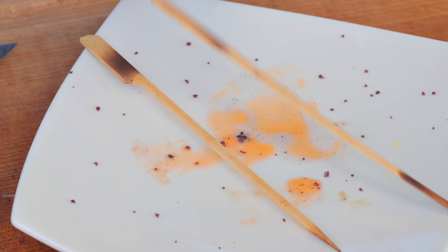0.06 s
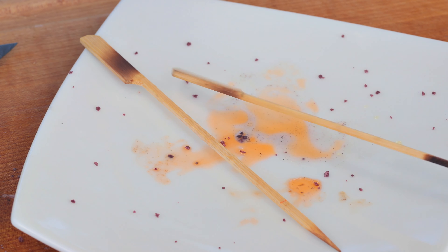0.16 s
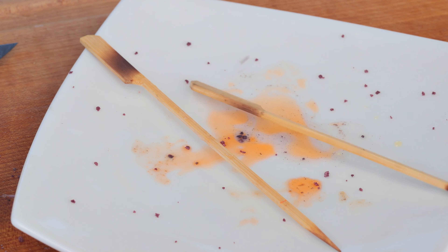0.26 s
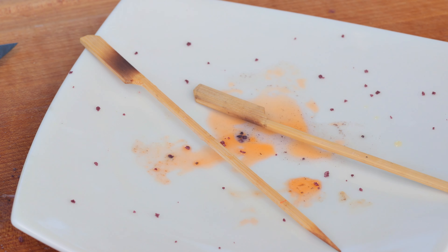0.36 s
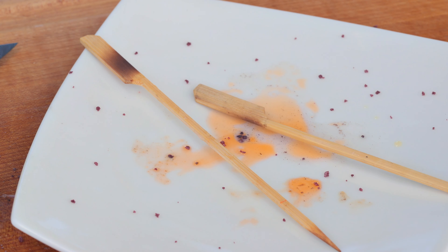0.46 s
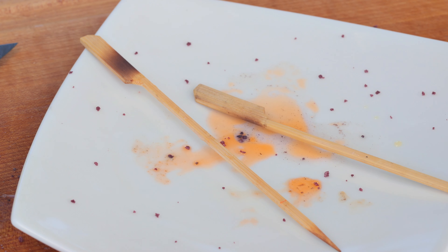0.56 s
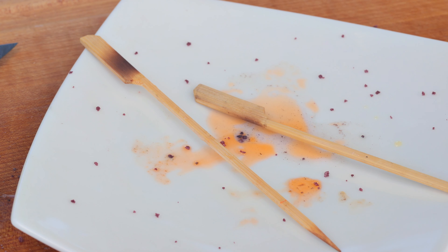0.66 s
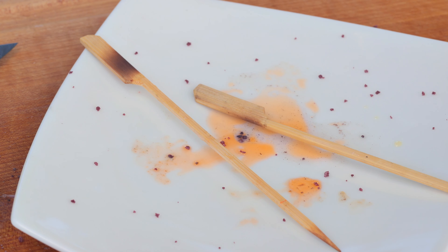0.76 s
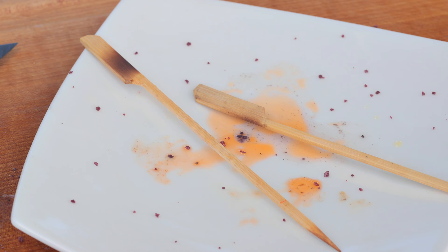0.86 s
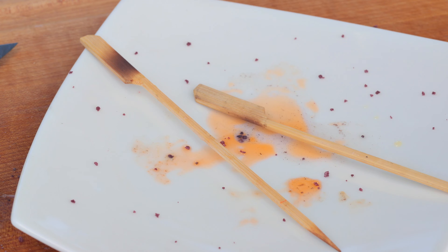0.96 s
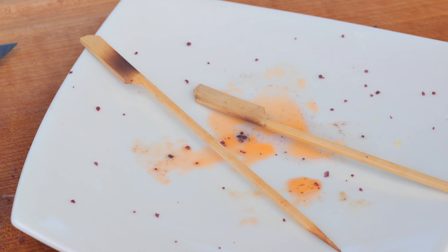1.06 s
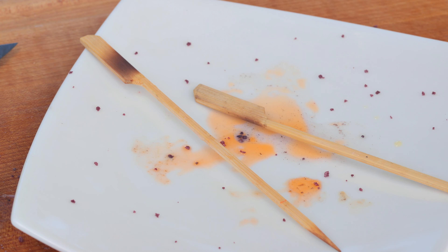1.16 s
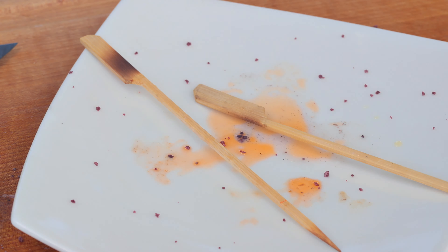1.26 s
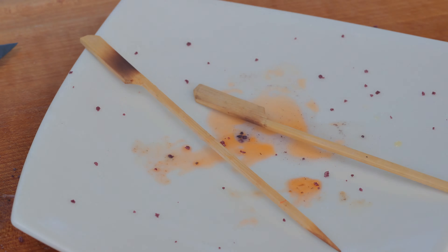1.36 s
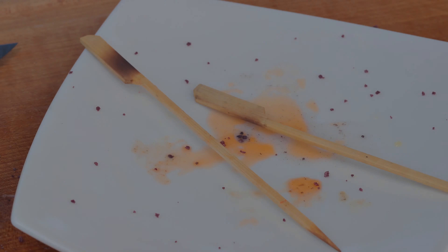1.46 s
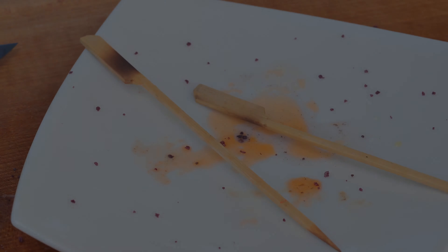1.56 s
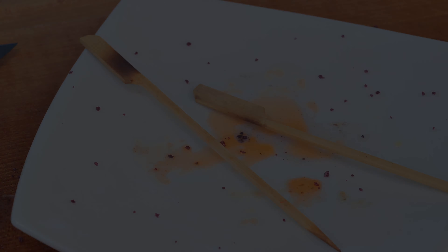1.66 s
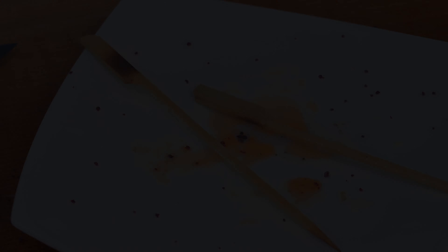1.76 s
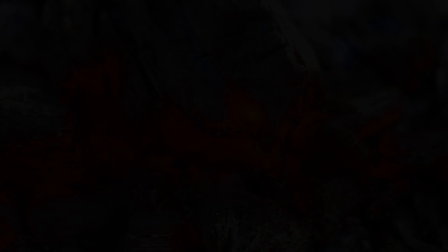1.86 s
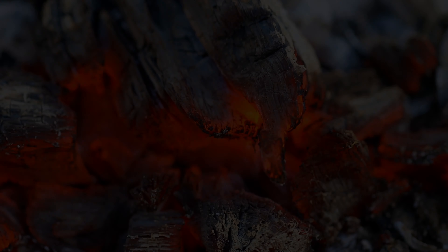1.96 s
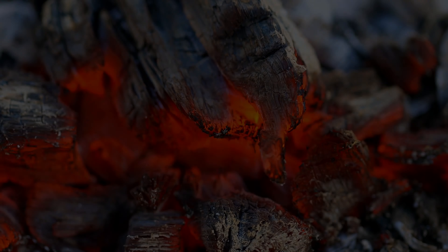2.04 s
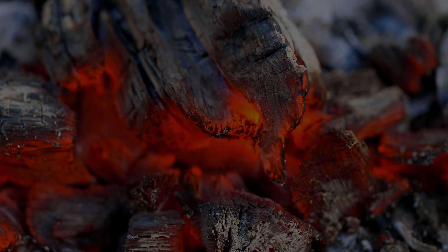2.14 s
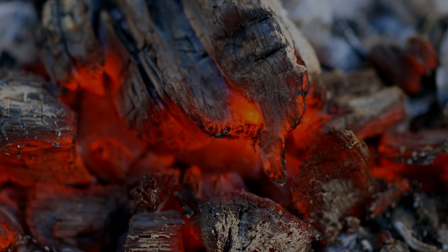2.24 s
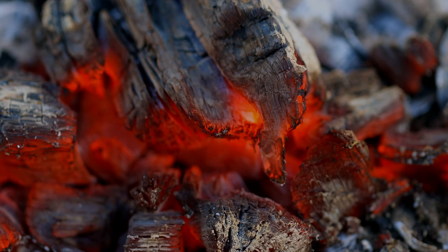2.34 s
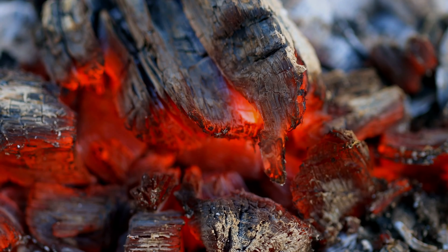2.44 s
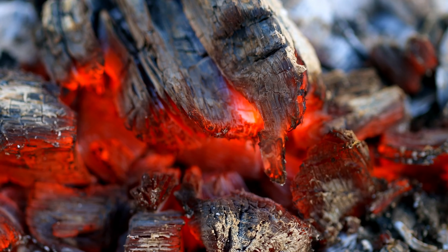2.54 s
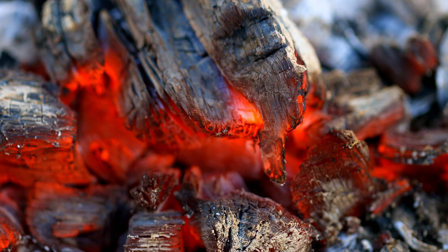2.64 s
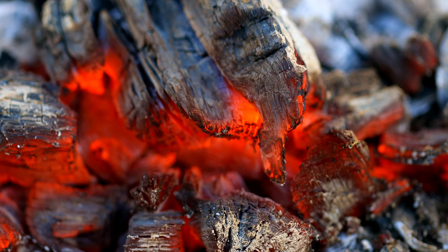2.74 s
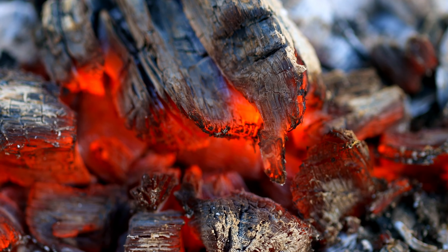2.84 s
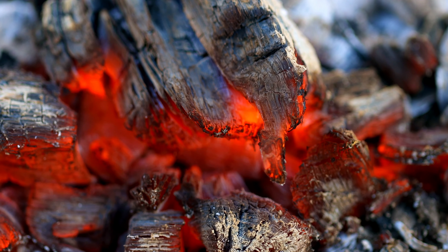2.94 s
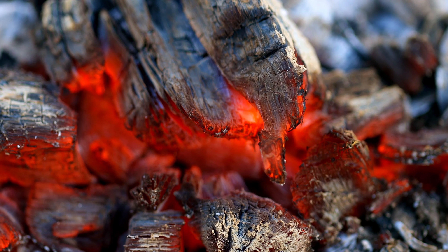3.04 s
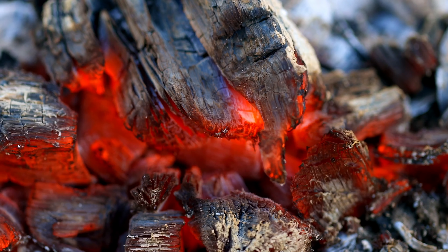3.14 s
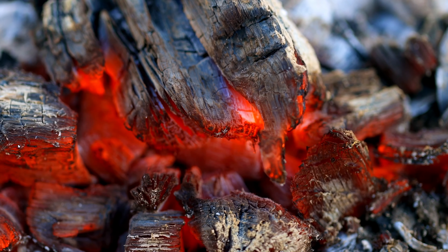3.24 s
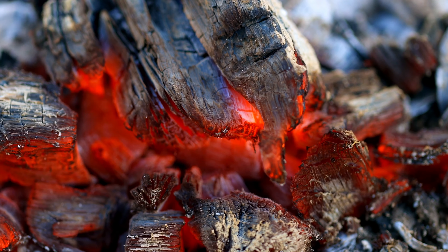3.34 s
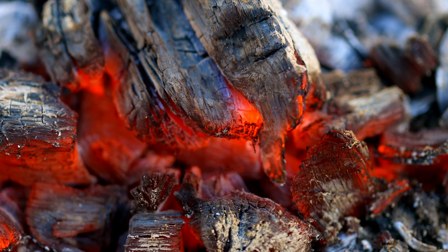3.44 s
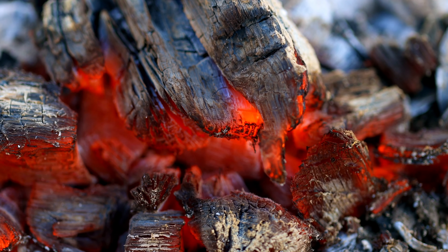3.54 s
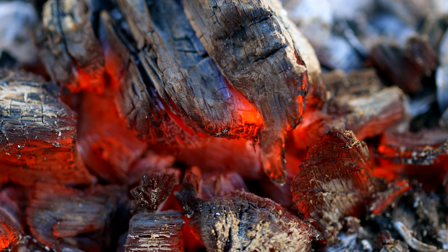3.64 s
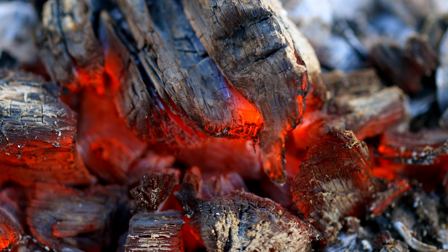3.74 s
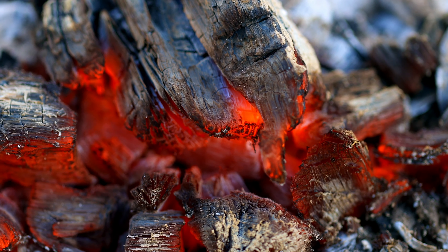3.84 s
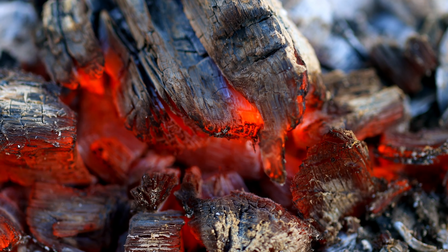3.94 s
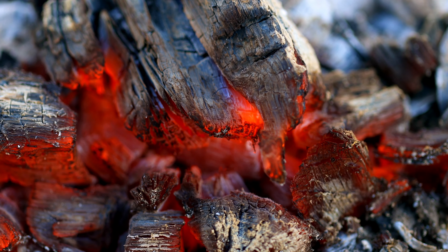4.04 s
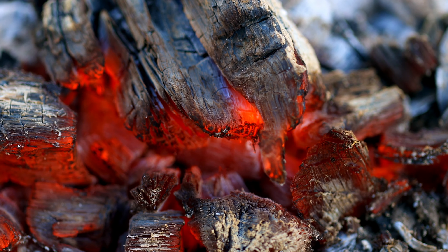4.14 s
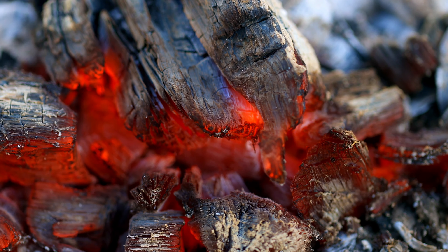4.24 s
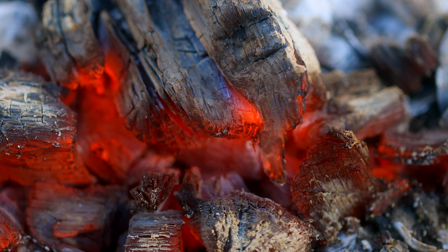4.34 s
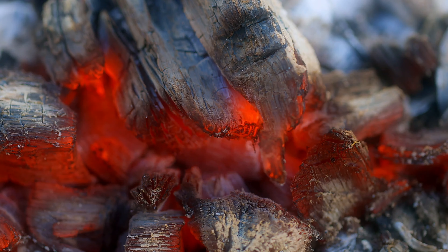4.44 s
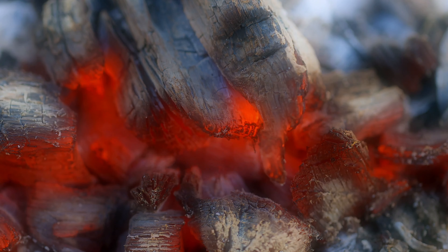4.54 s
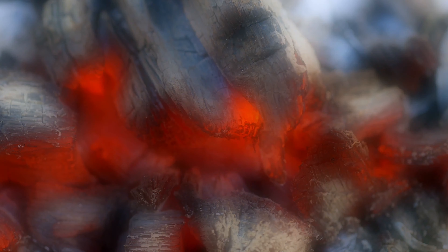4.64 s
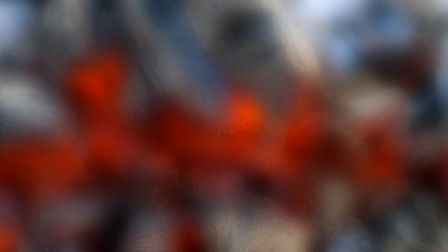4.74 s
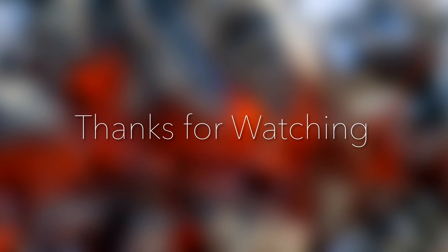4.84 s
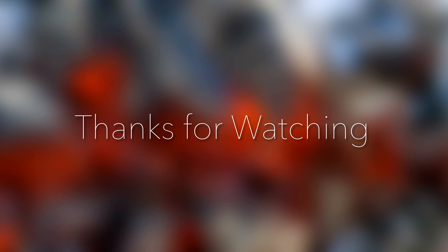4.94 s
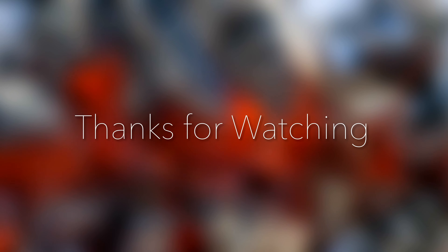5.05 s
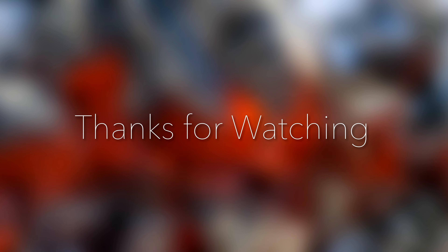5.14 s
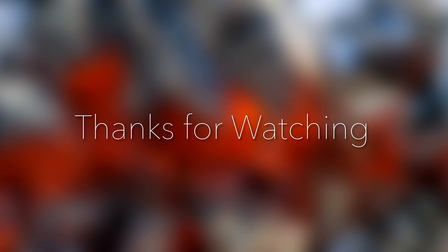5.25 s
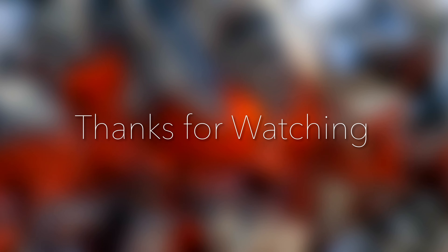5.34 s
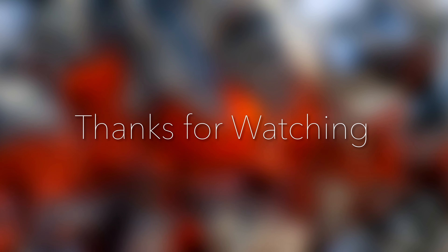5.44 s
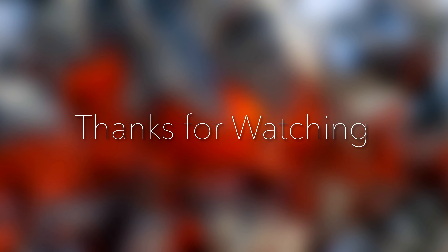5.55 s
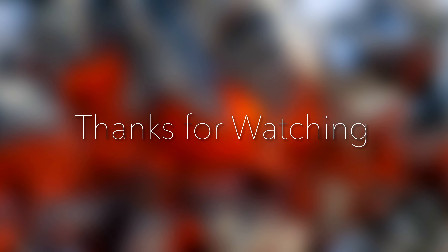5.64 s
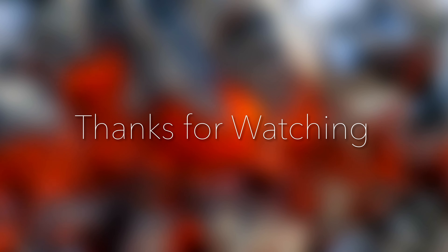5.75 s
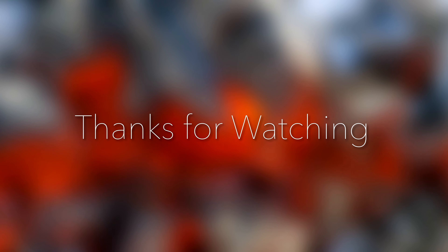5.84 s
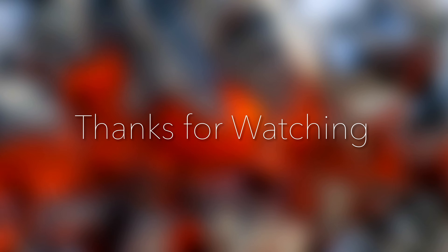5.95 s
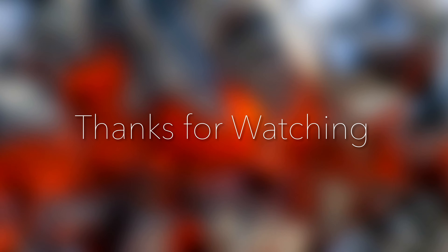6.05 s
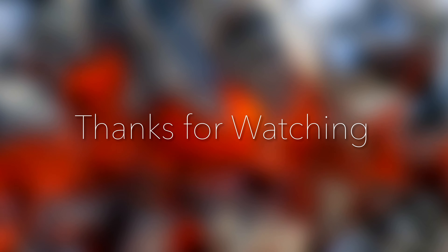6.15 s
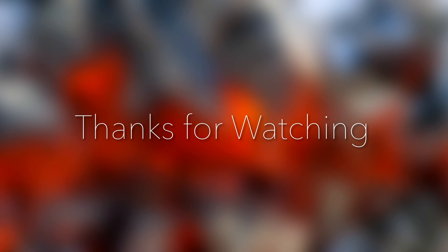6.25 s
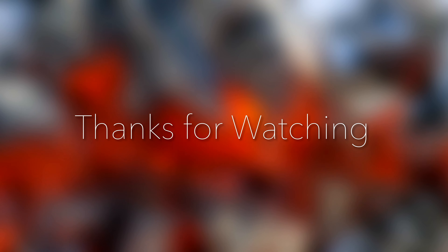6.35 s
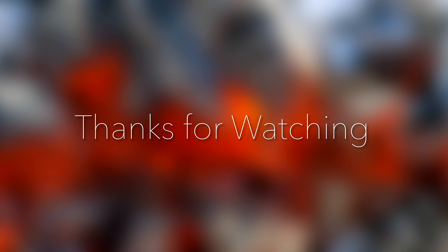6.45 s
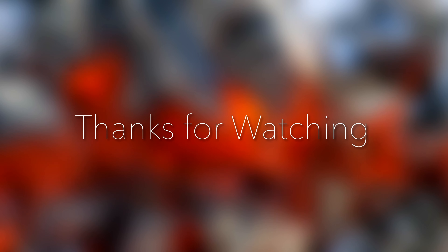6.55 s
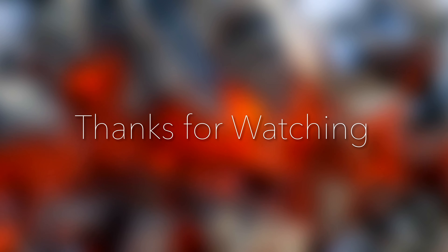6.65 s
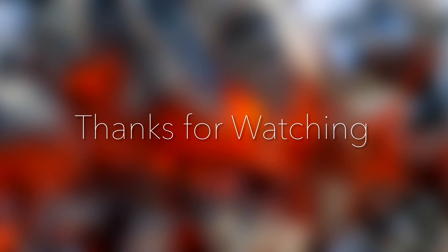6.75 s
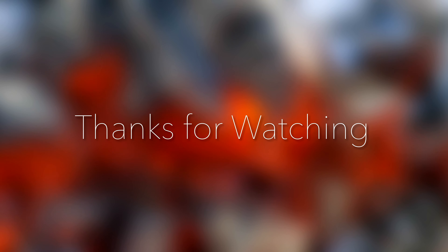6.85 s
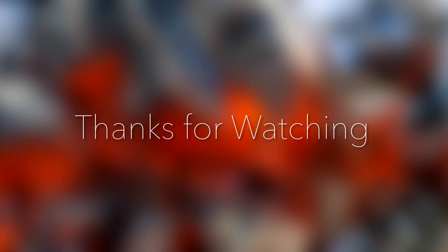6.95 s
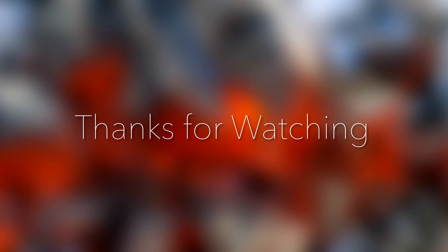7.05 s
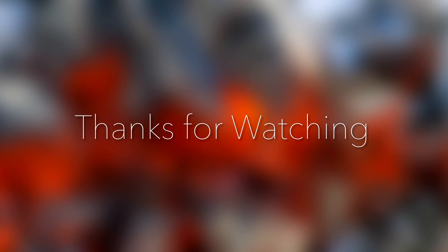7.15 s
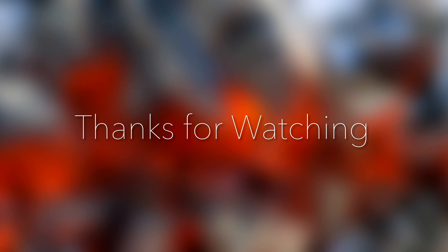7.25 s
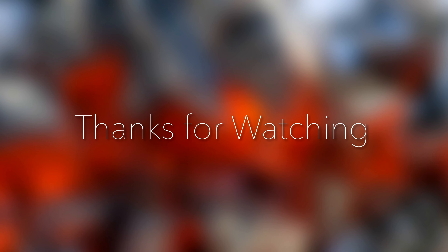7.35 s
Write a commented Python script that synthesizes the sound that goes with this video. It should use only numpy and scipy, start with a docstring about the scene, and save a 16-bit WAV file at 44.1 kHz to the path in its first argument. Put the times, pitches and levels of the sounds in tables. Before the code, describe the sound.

A stick drops on a small plate: two strong short clinks, then a fast fading patter. A quiet open-air bed follows, with low rumble, thin sizzle, small spitting ticks and distant gliding chirps. Then hot coals come forward suddenly, hissing and crackling densely with irregular crisp snaps until the cut. Close stereo microphone, coals slightly right, little reverberation.

```python
"""A wooden skewer drops on a china plate beside a charcoal grill outdoors, clinks and rattles to rest. Each
blow excites decaying modes of plate and stick, a low knock, and a burst of coloured noise, the clack of the
stick. Gas sizzles as fluttering noise, flares once and spits; in the last stage fizz and crackle are far
stronger. Charcoal pops are brief ragged noise bursts, the densest of them in that stage. A bird whistles
gliding sine tones over a low rumble and a rustle of moving air."""
import sys
import numpy as np
from scipy import signal
from scipy.fft import rfft, irfft, next_fast_len
from scipy.io import wavfile
from scipy.ndimage import uniform_filter1d, map_coordinates

SR = 44100
rng = np.random.default_rng(int(sys.argv[2]) if len(sys.argv) > 2 else 0)


def store_pcm(level_fs):
    """Save levels as 16-bit WAV."""
    pcm = np.round(np.clip(level_fs, -1, 1) * 32767).astype(np.int16)
    wavfile.write(sys.argv[1], SR, np.atleast_2d(pcm).T)


N = 326340
TOP_HZ = 15900  # upper band limit

# Bright spectrum of cracking charcoal. Each row: frequency in Hz, level in dB.
SNAP_SPECTRUM = [(1500, -41.5), (3500, -7), (4500, -2.5), (6500, 1.5), (9500, -0.5), (12500, 2),
                 (15500, 0.5)]
# Duller spectrum of cracking charcoal. Each row: frequency in Hz, level in dB.
BODY_SPECTRUM = [(60, -8.5), (250, 1), (750, -4), (1250, -1.5), (2200, -0.5), (2600, -2.5), (3000, 0),
                 (3800, -14), (6000, -30.5)]
# Broad spectrum of the fizzing bed and of the body of a spit. Each row: frequency in Hz, level in dB.
FIZZ_SPECTRUM = [(300, -1.5), (950, -2), (1500, -5.5), (2300, 1), (3200, 1.5), (4300, 0), (6400, 2.5),
                 (9000, 3), (11500, 0), (15000, 0.5)]


def amp(db):
    """Decibels are logarithmic: 20 dB is a factor of ten in amplitude."""
    return 10 ** (np.asarray(db) / 20)


def unit(x):
    """Root-mean-square normalization gives a signal unit power."""
    return x / np.sqrt(np.mean(x ** 2) + 1e-20)


def along(points, hz):
    """Interpolation on a logarithmic frequency axis, from rows of frequency in Hz and value."""
    f, v = np.transpose(points)
    return np.interp(np.log(hz + 1), np.log(f + 1), v)


def wobble(rate):
    """Band-limited fluctuation: a smooth curve through random knots, rate of them a second."""
    knots = rng.standard_normal(int(N * rate / SR) + 4)
    return map_coordinates(knots, [np.arange(N) * rate / SR])


def add(track, s, sound):
    """Superposition: a sound is summed into a track from time s in seconds."""
    part = track[..., max(round(s * SR), 0):][..., :sound.shape[-1]]
    part += sound[..., :part.shape[-1]]


def filtered(x, response):
    """Linear filtering: the spectrum is multiplied by a response of frequency."""
    m = next_fast_len(N + SR // 4)
    return irfft(rfft(x, m) * response(np.fft.rfftfreq(m, 1 / SR)), m)[..., :N]


def coloured(x, spectrum, size=1024):
    """Minimum-phase filtering: causal colour that keeps the power of white input below TOP_HZ."""
    hz = np.fft.rfftfreq(size, 1 / SR)
    gain = amp(along(spectrum, hz))
    cepstrum = irfft(np.log(gain / np.sqrt(np.mean(gain ** 2 * (hz < TOP_HZ)))))
    # folding the cepstrum onto positive time gives minimum phase
    cepstrum[1:size // 2] *= 2
    cepstrum[size // 2 + 1:] = 0
    impulse = irfft(np.exp(rfft(cepstrum)))
    return signal.oaconvolve(x, impulse[None], axes=1)[:, :N]


def rush(spectrum):
    """Partial coherence: stereo noise of rms 1 whose mid and side parts set the left-right correlation."""
    # Each row: frequency in Hz, left-right correlation (no unit).
    likeness = [(30, .45), (100, 0.79), (600, 0.28), (2400, 1), (8000, 0.52), (15000, 1)]

    def mid_side_response(hz):
        angle = np.arccos(np.clip(along(likeness, hz), -1, 1)) / 2
        return amp(along(spectrum, hz)) * (hz < TOP_HZ) * [np.cos(angle), np.sin(angle)]

    mid, side = filtered(rng.standard_normal((2, N)), mid_side_response)
    return unit(np.array([mid + side, mid - side]))


def placed(spread_db):
    """Level panning: a random spot raises one side by as many dB as it lowers the other."""
    return amp(np.array([[1], [-1]]) * rng.normal(0, spread_db))


def fracture(t60, ragged_db=3, tail_db=-24, tail_t60=0.068):
    """Brittle fracture: a ragged noise burst that dies fast, then faint scatter; t60s in seconds."""
    t = np.arange(SR // 25) / SR
    noise, sizes = rng.standard_normal((2, len(t)))
    run_db = ragged_db * unit(uniform_filter1d(sizes, size=10)) - 60 * (t / t60) ** 2
    burst = noise * (amp(run_db) + amp(tail_db - 60 * t / tail_t60))
    return burst / np.linalg.norm(burst) * np.sqrt(.005 * SR)  # energy of rms 1 held for 5 ms


def stages(fade_s):
    """Piecewise-steady levels: rumble, rustle, fizz and crackle in dB, with linear fades between stages."""
    # Each row: start in seconds, rumble, rustle, fizz and crackle levels in dB.
    rows = np.array([(0, -48, -50, -59.5, -82), (1.36, -56, -54.5, -65, -78.5),
                     (2.439, -51.5, -54, -50.5, -52.5)])
    t = np.arange(N) / SR
    entered = np.clip((t - rows[1:, :1]) / fade_s + .5, 0, 1)
    return rows[0, 1:, None] + np.diff(rows[:, 1:], axis=0).T @ entered


def outdoors(ease_db_per_s=1.17):
    """Broadband noise of moving air: low rumble and a soft rustle that eases steadily within each stage."""
    # Each row: frequency in Hz, level in dB.
    rumble_spectrum = [(15, -22), (30, -9), (50, -4.5), (75, 1), (110, -3.5), (160, -9), (300, -19),
                       (800, -54)]
    # Each row: frequency in Hz, level in dB.
    rustle_spectrum = [(70, -9), (170, 1), (280, -3.5), (450, -6), (700, -9), (1100, -17.5), (2000, -24),
                       (5000, -31)]
    rumble_db, rustle_db, _, _ = stages(fade_s=0.13)
    ease_db = ease_db_per_s * np.arange(N) / SR
    rumble = amp(rumble_db + .8 * wobble(7.5)) * rush(rumble_spectrum)
    rustle = amp(rustle_db - ease_db + 0.63 * wobble(14)) * rush(rustle_spectrum)
    return rumble + rustle


def bird(waver=0.011, flicker_db=3, arch=0.43):
    """Frequency modulation: each whistle is a wavering sine glide along a parabola, under an arched envelope."""
    # Each row: start in seconds, length in seconds, start, middle and end frequencies in Hz, level in dB.
    whistles = [(.56, 0.15, 2550, 2190, 1880, -66), (1.212, 0.28, 2670, 2520, 1780, -62.5),
                (1.511, .17, 1900, 2250, 2600, -56), (1.663, 0.09, 2550, 2830, 3550, -50.5),
                (1.756, 0.028, 3300, 2650, 2100, -52), (2.031, 0.087, 1840, 2260, 3950, -58.5),
                (2.137, 0.052, 3350, 2950, 2540, -48.5), (2.217, 0.05, 1750, 2830, 2950, -53),
                (2.313, 0.063, 3150, 2910, 2620, -51.5), (2.407, 0.059, 2250, 2080, 1820, -56),
                (3.182, .28, 2950, 4080, 4680, -56), (3.95, 0.054, 3310, 3000, 2660, -49),
                (4.03, 0.052, 2320, 2900, 3050, -54), (4.091, .2, 3230, 2920, 2520, -58.5)]
    song, t = np.zeros(N), np.arange(N) / SR
    drift, flicker = 1 + waver * wobble(150), amp(flicker_db * wobble(70))
    for s, length, start_hz, middle_hz, end_hz, db in whistles:
        on = (t > s) & (t < s + length)
        u = (t[on] - s) / length
        bend_hz = 2 * (2 * middle_hz - start_hz - end_hz) * u * (1 - u)
        hz = start_hz + (end_hz - start_hz) * u + bend_hz
        tone = np.sin(2 * np.pi * np.cumsum(hz * drift[on]) / SR)
        envelope = np.abs(np.sin(np.pi * u)) ** arch
        song[on] += np.sqrt(2) * amp(db) * envelope * tone
    return np.array([song, song]) * flicker


def crackle(count=1300, spread_db=5.5, cap_db=12, body_db=-8, t60=0.0013):
    """Random point process: many tiny cracks of log-normal size, over the fluctuating fizz of the glowing bed."""
    # Air drawn over the coals makes them fizz. Each row: time in seconds, change of fizz level in dB.
    draught = [(2.4, 0), (3.3, 0), (5.5, 1.2), (5.95, -0.1), (6.35, -2.5), (7.4, -0.5)]
    _, _, fizz_db, _ = stages(fade_s=0.055)
    _, _, _, crackle_db = stages(fade_s=0.067)
    snap, body = np.zeros((2, 2, N))
    times_s = rng.uniform(0, N / SR, count)
    for when, size, dull in zip(times_s, *rng.standard_normal((2, count))):
        tick = amp(min(spread_db * size, cap_db)) * fracture(t60)
        add(snap, when, tick)
        add(body, when, tick * amp(body_db + 4.6 * np.tanh(dull)))
    cracks = coloured(snap, SNAP_SPECTRUM) + coloured(body, BODY_SPECTRUM)
    unrest_db = 2.64 * wobble(350) + 1.4 * wobble(23) + .5 * wobble(3.9)
    fizz = rush(FIZZ_SPECTRUM) * unit(amp(unrest_db))
    draught_db = np.interp(np.arange(N) / SR, *np.transpose(draught))
    return amp(crackle_db) * cracks + amp(fizz_db + draught_db) * fizz


def sizzle(depth=0.44, unsteady=.015):
    """Jet noise with amplitude modulation: escaping gas flutters, louder and faster while it flares."""
    # Each row: frequency in Hz, level in dB.
    jet_spectrum = [(2000, -14.5), (6000, -25), (7500, -9), (9000, -1), (10800, 1.5), (12200, -3.5),
                    (13300, -3), (14500, -2), (15700, -6)]
    rest_db, flare_db, swell_db = -53, -47, 5  # the flare swells towards its middle
    rest_hz, flare_hz = 88.6, 124  # mean flutter rates
    start_s, end_s, edge_s = 2.445, 4.0, 0.016  # the flare
    sag_db_per_s, sag_start_s = 2.5, 1.35  # the jet weakens before it flares
    t = np.arange(N) / SR
    inside_s = np.minimum(t - start_s, end_s - t)
    flare = np.clip(inside_s / edge_s + .5, 0, 1)
    swell = np.maximum(2 * inside_s / (end_s - start_s), 0)
    sag_db = sag_db_per_s * np.maximum(t - sag_start_s, 0) * (t < start_s)
    level_db = rest_db - sag_db + flare * (flare_db - rest_db) + swell * swell_db
    rate_hz = rest_hz + flare * (flare_hz - rest_hz)
    phase = 2 * np.pi * np.cumsum(rate_hz * (1 + unsteady * wobble(30))) / SR
    flutter = unit(1 + depth * np.sin(phase))
    return amp(level_db + 0.93 * wobble(19)) * flutter * rush(jet_spectrum)


def spits(edge_s=0.0027, rough_db=2):
    """Transient jet noise: gas pockets blow out in short, rough bursts; longer ones have more body."""
    # Each row: start in seconds, length in seconds, hiss level in dB.
    bursts = [(.745, 0.007, -39.5), (0.777, .008, -42), (1.158, 0.0067, -39.5), (1.293, 0.0084, -42),
              (1.579, 0.01, -43), (1.829, .008, -46), (1.862, 0.0095, -45.5), (1.982, 0.012, -43.5),
              (2.346, 0.014, -42.5), (2.625, 0.015, -48), (5.738, .016, -48), (6.089, 0.065, -40.5)]
    # Each row: frequency in Hz, level in dB.
    hiss_spectrum = [(2000, -10), (5000, -31), (8500, 7.5), (11500, 7.5), (13000, 2), (15500, 1)]
    # full body relative to the hiss, length that reaches it, loss per halving of the length
    full_body_db, full_s, thinning_db = 3, 0.018, 20
    hiss, body = np.zeros((2, N))
    t = np.arange(SR // 10) / SR
    for s, length, hiss_db in bursts:
        gate = np.clip(t / edge_s, 0, 1) * np.exp(-np.maximum(t - length, 0) / edge_s)
        body_db = hiss_db + full_body_db + thinning_db * min(np.log2(length / full_s), 0)
        add(hiss, s, amp(hiss_db) * gate)
        add(body, s, amp(body_db) * gate)
    roughness = unit(amp(rough_db * wobble(700)))
    return roughness * (hiss * rush(hiss_spectrum) + body * rush(FIZZ_SPECTRUM))


def pops(push_s=0.003, push_db=-4, push_full_t60=0.013):
    """Fracture and pressure pulse: charcoal splits with snap and body; big splits last longer and puff gas."""
    # Each row: start in seconds, snap level in dB, body level in dB.
    splits = [(2.5115, -43, -42), (2.7656, -37, -42.5), (2.7953, -35, -36), (2.9235, -37.5, -36),
              (3.0169, -37, -39.5), (3.0787, -37, -46), (3.1144, -36, -34.5), (3.159, -36, -42),
              (3.435, -38.5, -34.5), (3.5259, -29.5, -30.5), (3.659, -34, -44), (3.8753, -32.5, -41.5),
              (3.994, -31.5, -36), (4.056, -33.5, -37), (4.2753, -41, -41), (4.3018, -31, -37.5),
              (4.3462, -32.5, -42.5), (4.4202, -37, -41.5), (4.5067, -35.5, -41.5), (4.5695, -37, -43),
              (4.5936, -36, -42.5), (4.7344, -37.5, -46), (4.791, -37, -43), (4.844, -35, -45),
              (4.8771, -31.5, -35.5), (4.986, -27.5, -36.5), (5.0307, -31.5, -38), (5.156, -37, -45),
              (5.21, -33.5, -37), (5.3058, -37.5, -42.5), (5.4222, -32, -38), (5.4484, -37.5, -41.5),
              (5.7537, -34.5, -42), (6.0872, -31, -38.5), (6.093, -29, -46), (6.1455, -31, -32.5),
              (6.2009, -35.5, -44), (6.2577, -34.5, -41), (6.3569, -46, -45.5), (6.4738, -37.5, -48),
              (6.5384, -32, -35.5), (6.565, -42, -42.5), (6.6649, -31.5, -36), (6.7594, -34.5, -41),
              (6.9081, -36.5, -41.5), (6.9974, -30, -37), (7.0295, -30, -34.5), (7.0601, -34, -41.5),
              (7.0735, -32, -39.5), (7.0901, -40, -44.5), (7.333, -37, -44)]
    middle_t60, middle_db, doubling_db = 0.0078, -31.5, 5.5  # t60 in s at a middling snap; dB that double it
    snap, body, push = np.zeros((3, 2, N))
    u = np.arange(SR // 20) / SR / push_s
    pulse = u * np.exp(1 - u)  # peaks at 1 after push_s
    for s, snap_db, body_db in splits:
        side = placed(spread_db=0.97)
        t60 = middle_t60 * 2 ** ((snap_db - middle_db) / doubling_db)
        add(snap, s, side * amp(snap_db) * fracture(t60))
        add(body, s, side * amp(body_db) * fracture(t60))
        add(push, s, side * amp(body_db + push_db) * min(t60 / push_full_t60, 1) * pulse)
    return coloured(snap, SNAP_SPECTRUM) + coloured(body, BODY_SPECTRUM) + push


def rattle(count=7, ring_db=-10.5, ring_loss_db=3.0, clack_db=-25.5, clack_loss_db=1.2):
    """Inelastic bouncing: gaps shrink geometrically as blows weaken; rows as the blows in skewer."""
    start_s, first_gap_s, shrink = .312, .0205, .86  # shrink: each gap over the one before
    k = np.arange(count)
    gaps = first_gap_s * shrink ** k
    times_s = start_s + np.cumsum(gaps) - gaps
    second_spot = np.ones(count)
    return list(zip(times_s, ring_db - ring_loss_db * k, clack_db - clack_loss_db * k, second_spot))


def skewer(clack_t60=0.034, build_s=0.0013):
    """Modal synthesis: the place of a blow weights the modes of plate and stick; the stick adds noise; soft
    blows are duller."""
    # Each row: start in seconds, ring level in dB, clack level in dB,
    # place from 0 (first spot) to 1 (second spot).
    blows = [(.038, -11, -23, 0.44), (.0752, -28, -39.5, 0.48), (.1168, -15.5, -31, 0.7),
             (.14, 1, -10, 0.011), (.218, -24.5, -24, 0.16), (.2551, -5, -14, 0.68), (.267, 1, -20, 0.96),
             (.285, -39, -30, 0.83)]
    # Resonances struck by each blow: modes of the china plate, the stick's own resonances near 2460, 3856, #
    # 4423 and 6867 Hz, and a low knock at 310 Hz. Each row: frequency in Hz, levels at the first and second #
    # spot in dB, t60 in seconds.
    resonances = [(310, -19, -37, 0.04), (1234, -33, -25, 0.14), (1545, -34, -37, 0.08), (2066, -31, -37, 0.15),
                  (2390, -13, -14, 0.115), (2460, -29, -29, 0.04), (3856, -28, -30, 0.04),
                  (4423, -46, -28, 0.09), (5521, -25, -30, 0.045), (6164, -8, -24, 0.068),
                  (6344, -16, -27, 0.04), (6867, -22, -30, 0.04), (8229, -15, -23, 0.09), (8565, -20, -30, 0.06),
                  (8819, -23, -46, 0.11), (9199, -15, -43, 0.135), (11214, -21, -25, 0.07),
                  (12125, -23, -31, 0.045), (13087, -28, -30, 0.055), (14290, -32, -35, 0.12),
                  (15257, -27, -24, 0.075)]
    # The stick itself. Each row: frequency in Hz, level in dB.
    clack_spectrum = [(100, -24.5), (300, -19.5), (550, -7), (1700, -9), (2550, 8), (3200, -1), (4100, 4.5),
                      (5300, -2.5), (7500, 0), (9500, -2), (15000, -2)]
    # clack level of a hard blow, treble dB lost per dB below it, band over which the loss sets in
    hard_db, dulling, dull_from_hz, dull_full_hz = -11.5, .35, 9000, 15000
    ring, clack, t = np.zeros((2, N)), np.zeros((2, N)), np.arange(SR // 4) / SR
    hz, first_db, second_db, t60 = np.transpose(resonances)
    decay = amp(-60 * t / t60[:, None])
    modes = np.sin(2 * np.pi * hz[:, None] * t) * decay * (1 - np.exp(-t / build_s))
    sides = np.hstack([placed(spread_db=.5) for _ in resonances])  # each mode radiates its own way
    noise_hz = np.fft.rfftfreq(len(t), 1 / SR)
    for s, ring_db, clack_db, place in blows + rattle():
        treble_db = dulling * min(clack_db - hard_db, 0)
        dull = lambda f: amp(np.interp(f, [dull_from_hz, dull_full_hz], [0, treble_db]))
        mode_db = ring_db + first_db + np.clip(place, 0, 1) * (second_db - first_db)
        add(ring, s, sides * dull(hz) * amp(mode_db) @ modes)
        # mostly common to both sides
        noise = rng.standard_normal(len(t)) + 0.24 * rng.standard_normal((2, len(t)))
        noise = irfft(rfft(noise) * dull(noise_hz), len(t))
        add(clack, s, amp(clack_db - 60 * t / clack_t60) * noise)
    return ring + coloured(clack, clack_spectrum)


def yard(x):
    """Diffuse reverberation: convolution with noise decaying at its own rate per band, different on each side."""
    # Each row: frequency in Hz, t60 in seconds.
    decay_times = [(200, 0.15), (2500, 0.21), (12000, 0.0775)]
    hz, t, z = signal.stft(rng.standard_normal((2, SR // 3)), SR, nperseg=256)
    decay = amp(-60 * t / along(decay_times, hz)[:, None])
    tail = signal.istft(z * decay, SR, nperseg=256)[1]
    return signal.fftconvolve(x, tail / np.linalg.norm(tail[0]), axes=1)[:, :N]


def ports(x, lag_s=0.00038):
    """Arrival-time difference: close sounds reach two ports out of step, which adds an opposed side signal."""
    # Each row: frequency in Hz, side level in dB.
    width = [(500, -17.5), (2400, -38), (5000, -13.5), (13000, -22)]
    # half the difference of copies led and lagged by lag_s
    response = lambda hz: 1j * amp(along(width, hz)) * np.sin(2 * np.pi * hz * lag_s)
    side = filtered(x.mean(axis=0), response)
    return x + np.array([side, -side])


def scene():
    """Direct and reverberant sound add: plate and coals are near and dry, the bird is farther off."""
    near, song = skewer() + pops() + spits(), bird()
    direct = (ports(near + crackle()) + sizzle()) * amp([[-.3], [.3]])  # slightly to the right
    return direct + song + yard(amp(-18.5) * near + amp(-7.5) * song) + outdoors()


def record(dry):
    """Low-pass filtering: a linear slope 300 Hz wide, centred on TOP_HZ, ends the band."""
    return filtered(dry, lambda hz: np.clip((TOP_HZ - hz) / 300 + .5, 0, 1))


dry = scene()
out = record(dry)
store_pcm(out)
```